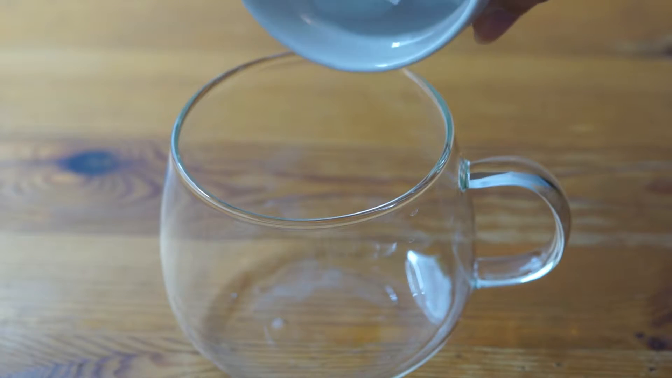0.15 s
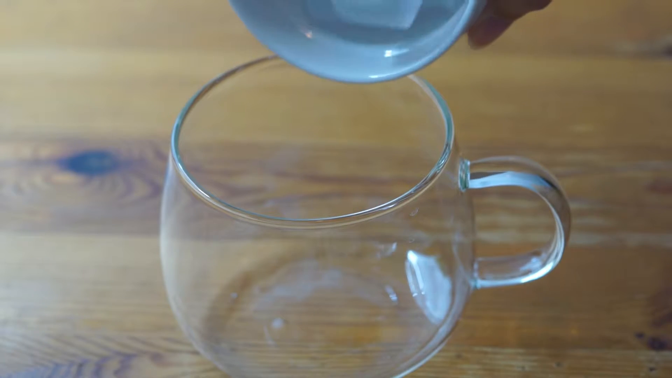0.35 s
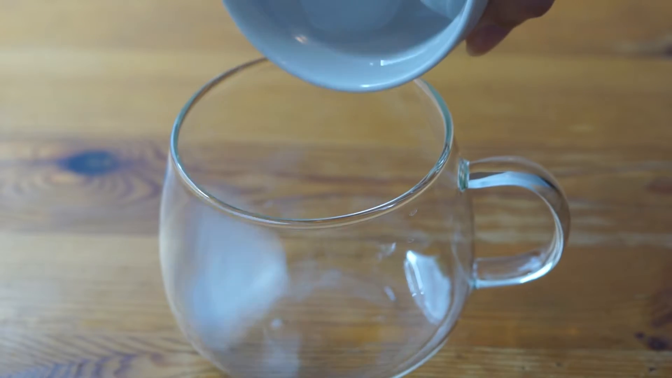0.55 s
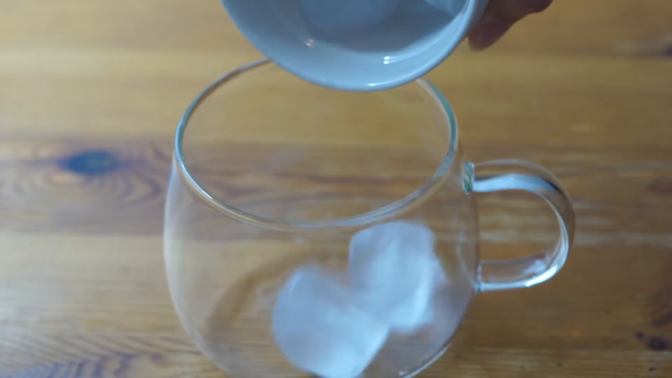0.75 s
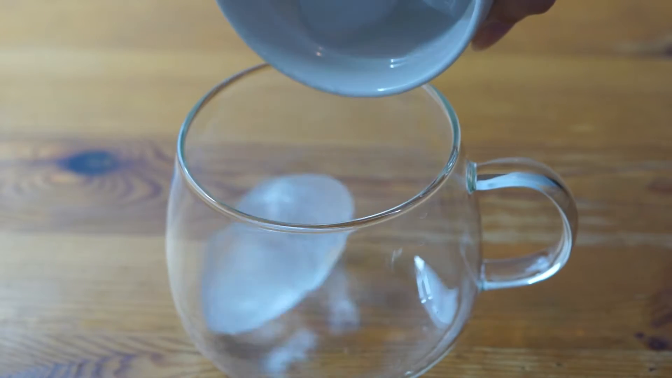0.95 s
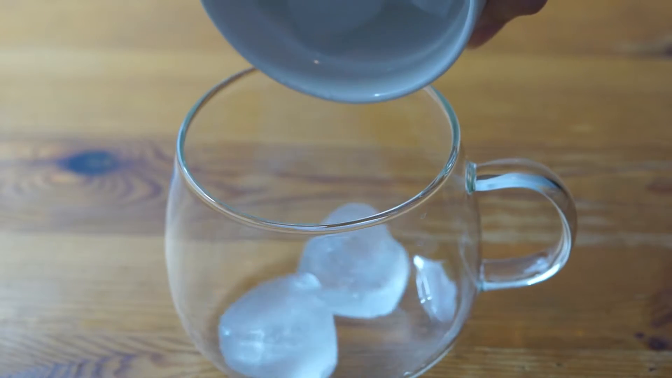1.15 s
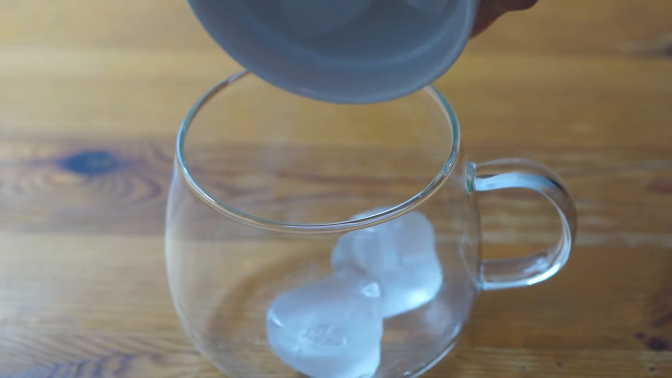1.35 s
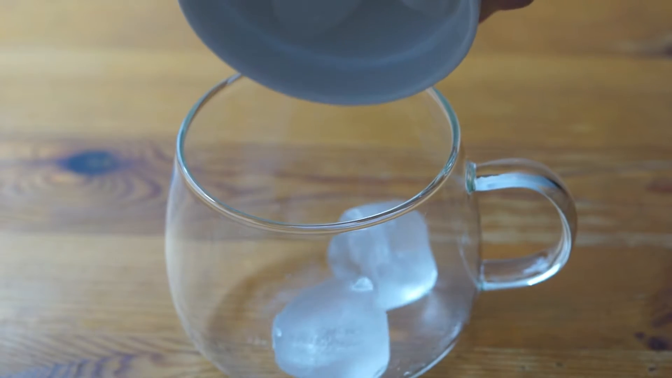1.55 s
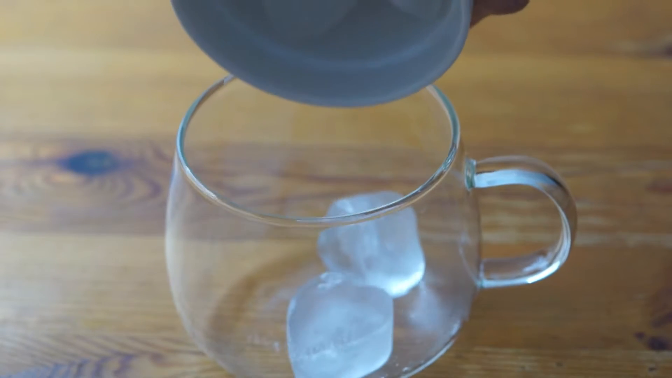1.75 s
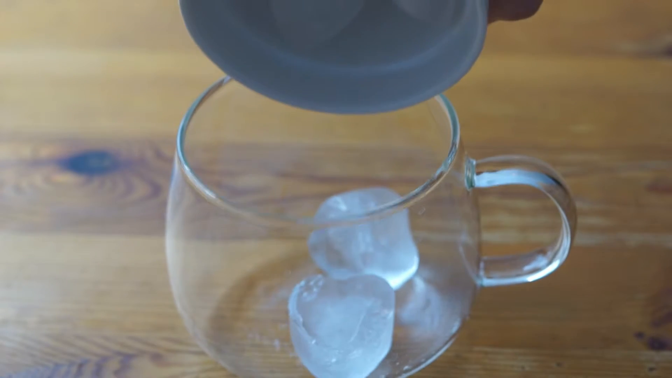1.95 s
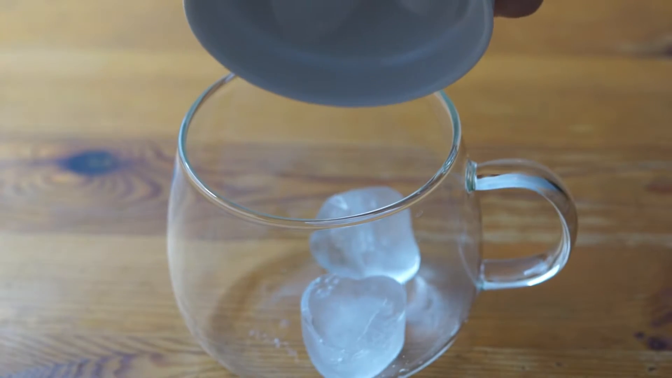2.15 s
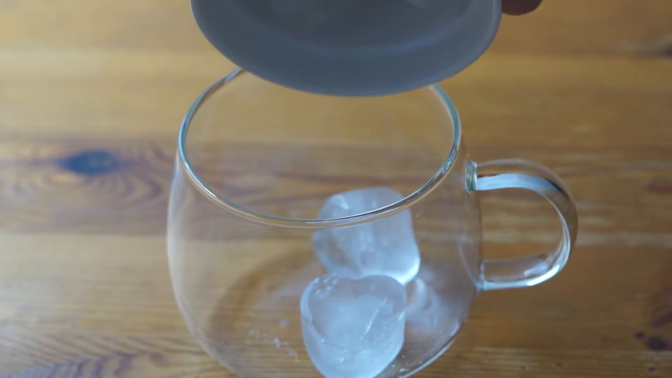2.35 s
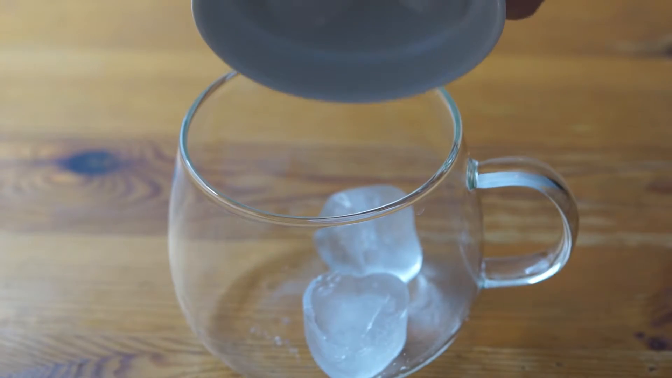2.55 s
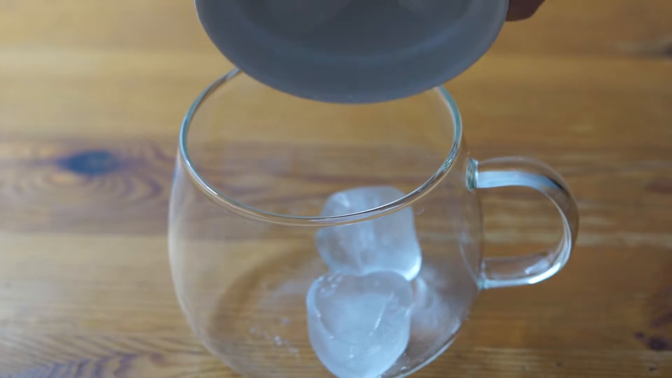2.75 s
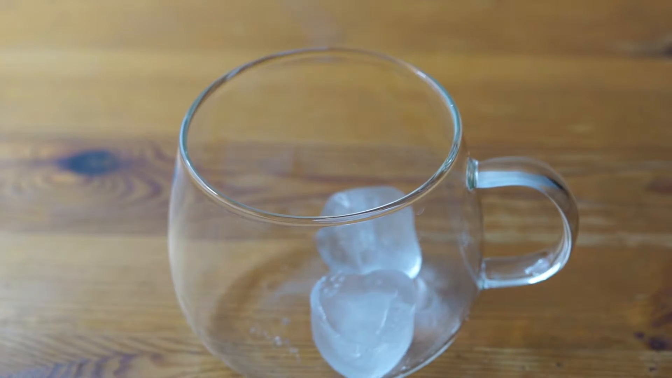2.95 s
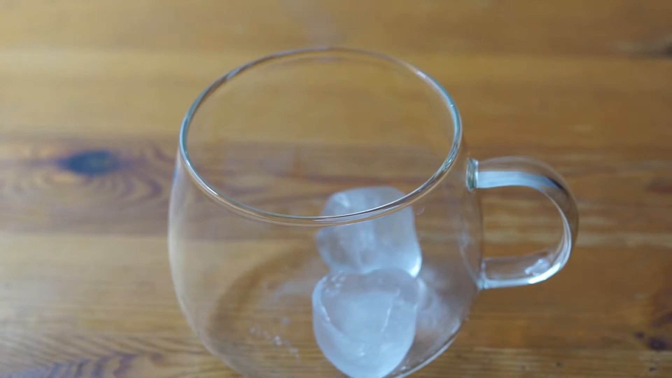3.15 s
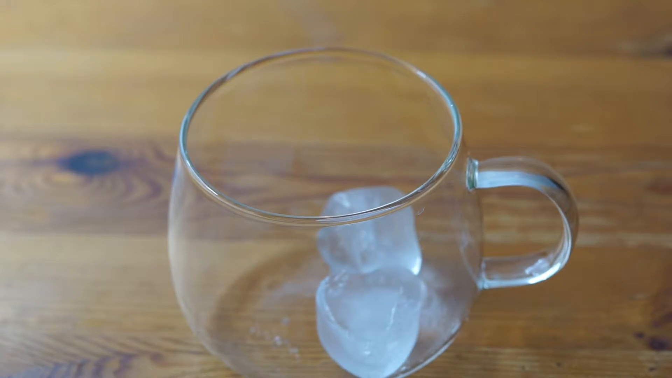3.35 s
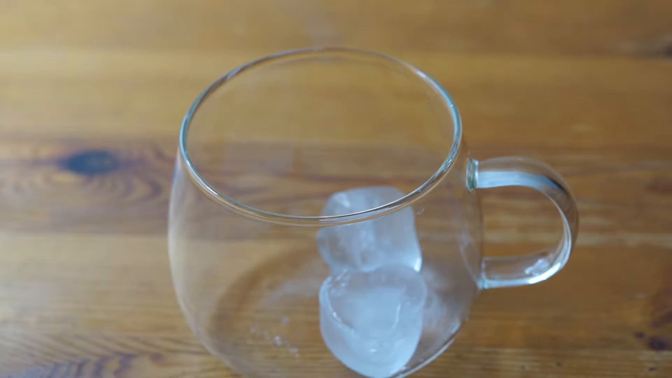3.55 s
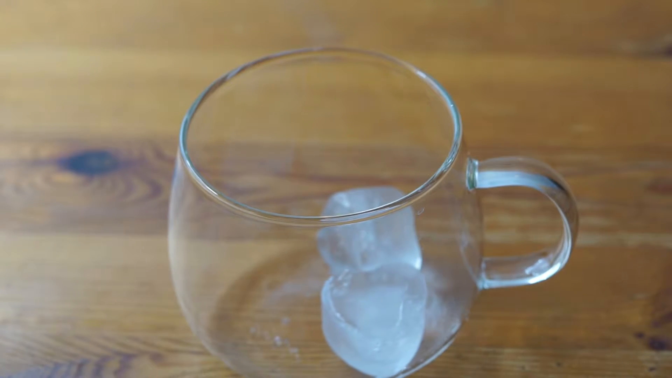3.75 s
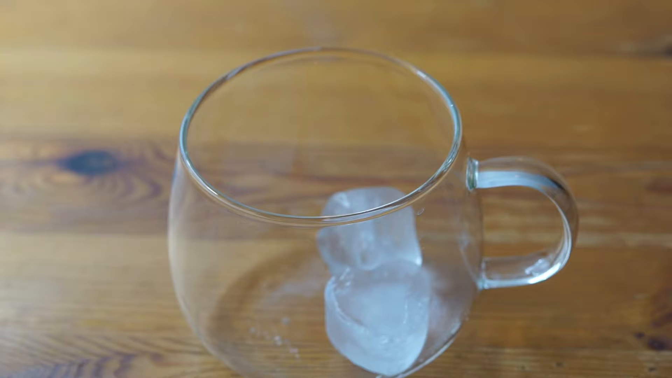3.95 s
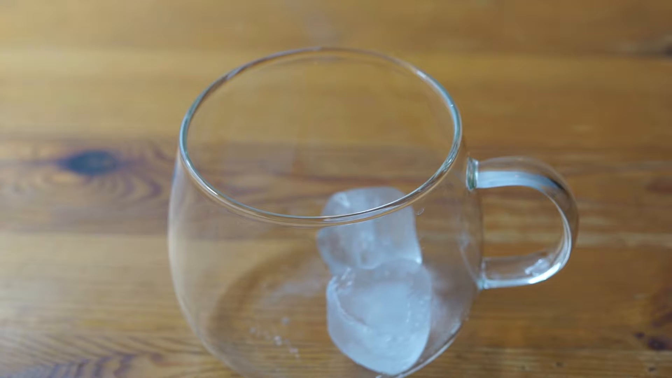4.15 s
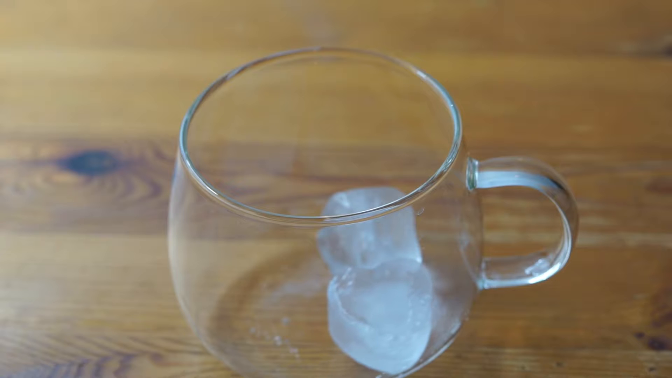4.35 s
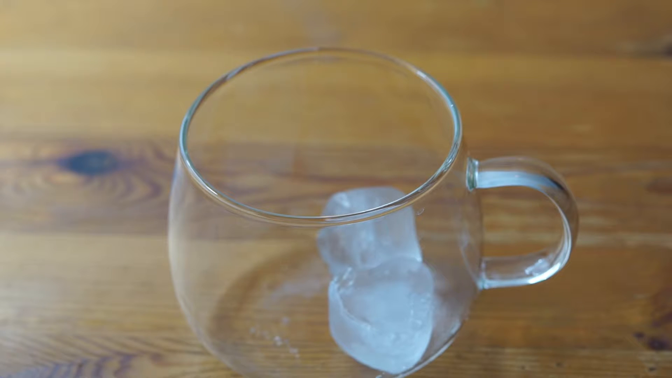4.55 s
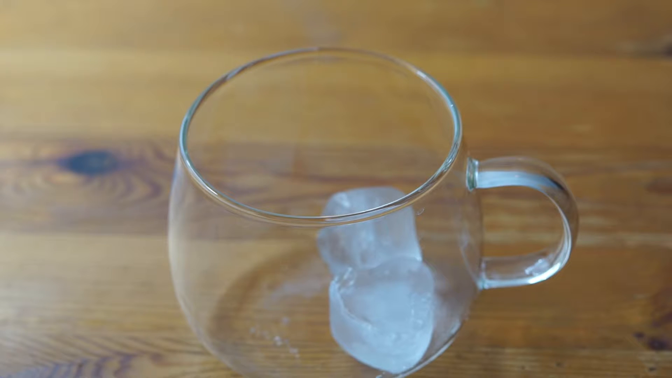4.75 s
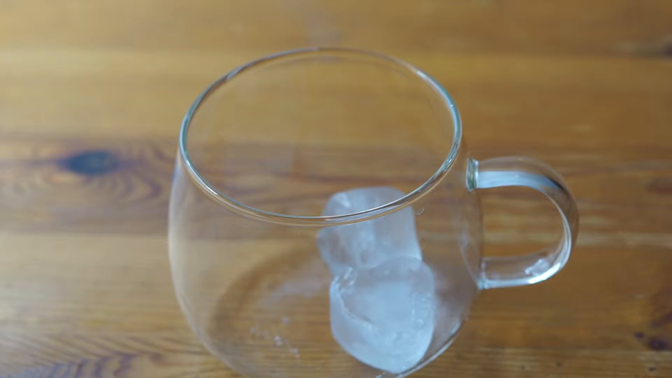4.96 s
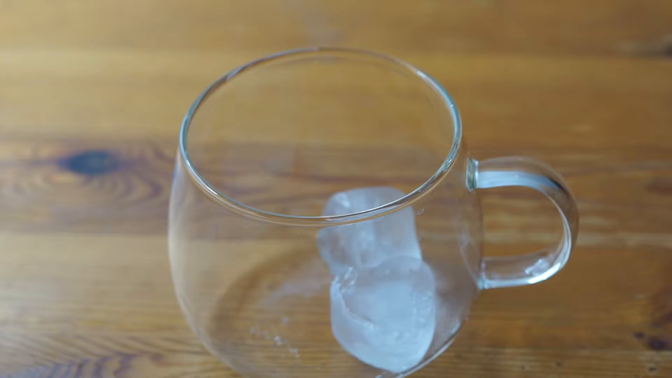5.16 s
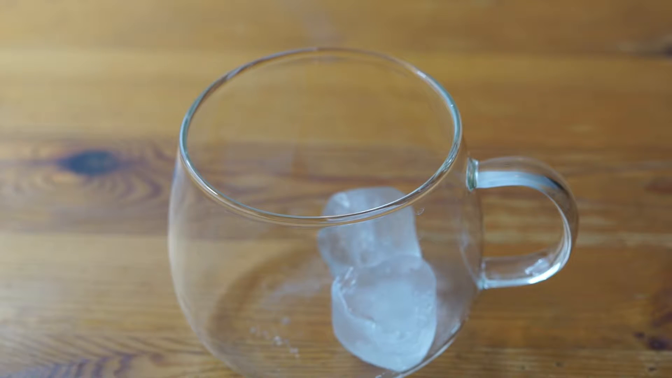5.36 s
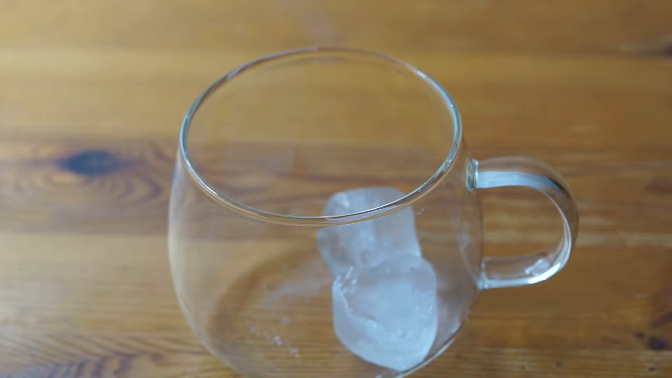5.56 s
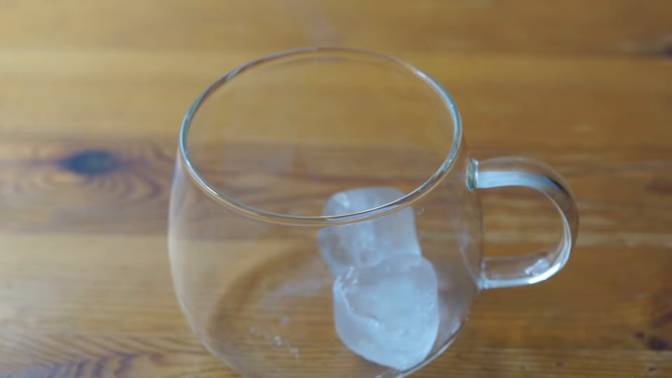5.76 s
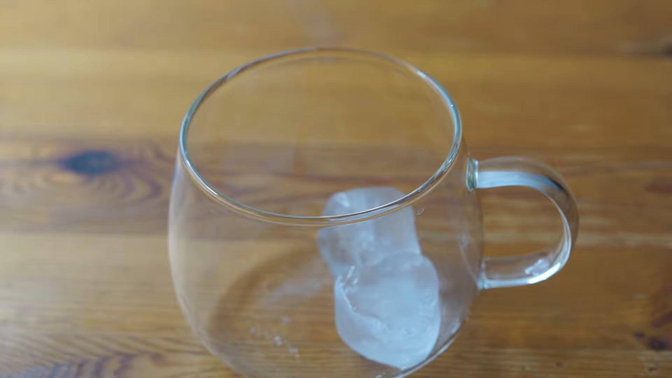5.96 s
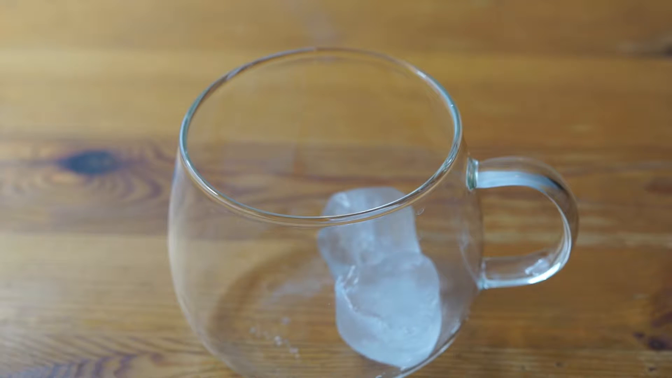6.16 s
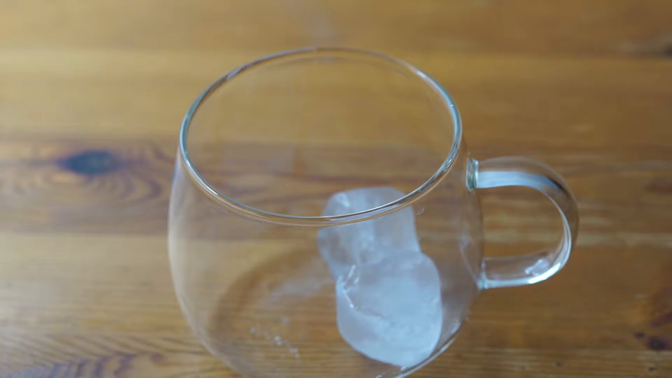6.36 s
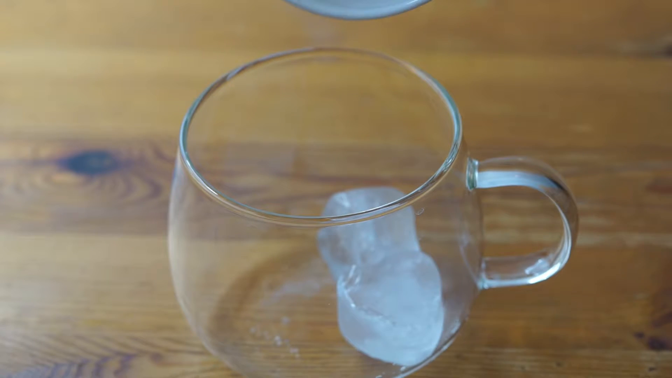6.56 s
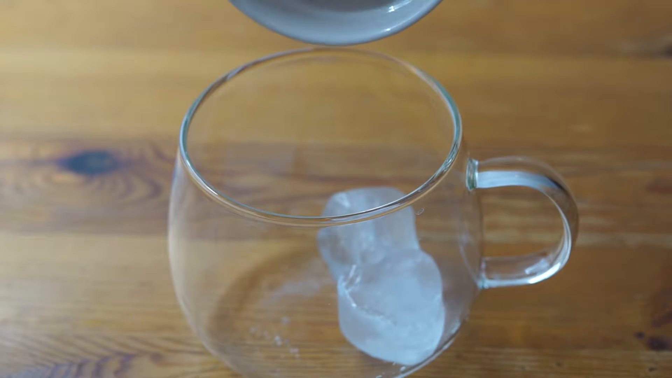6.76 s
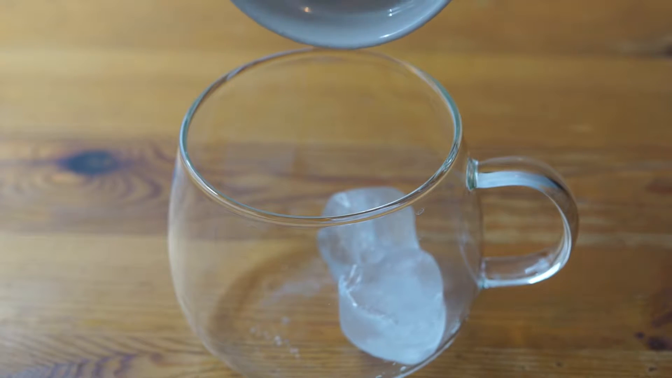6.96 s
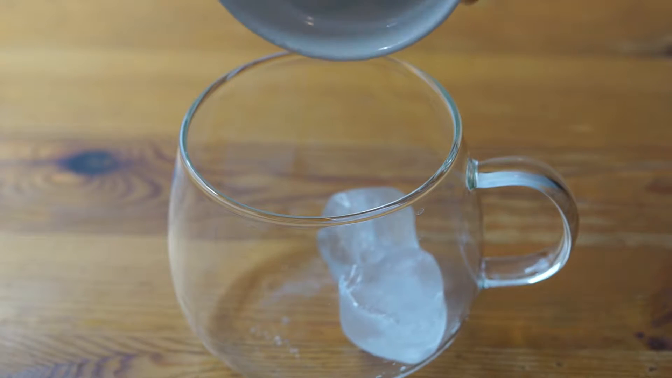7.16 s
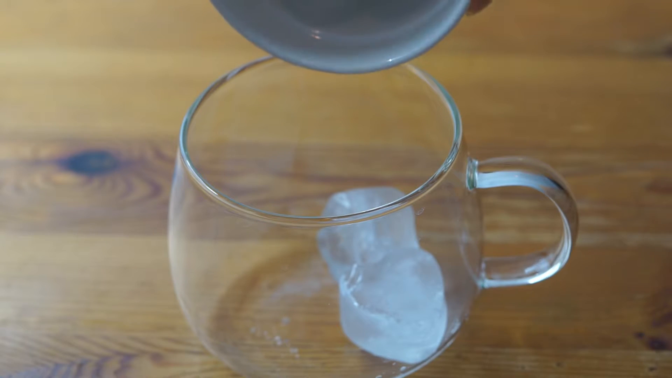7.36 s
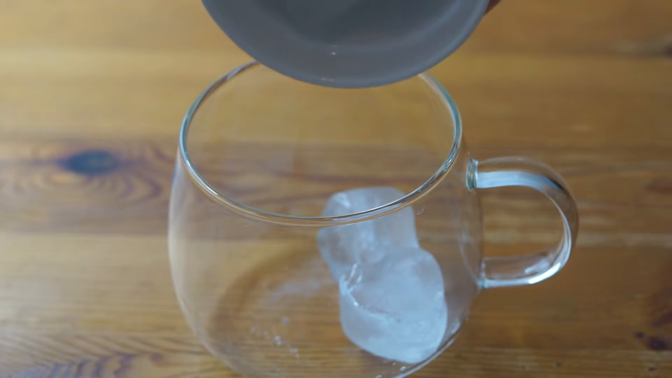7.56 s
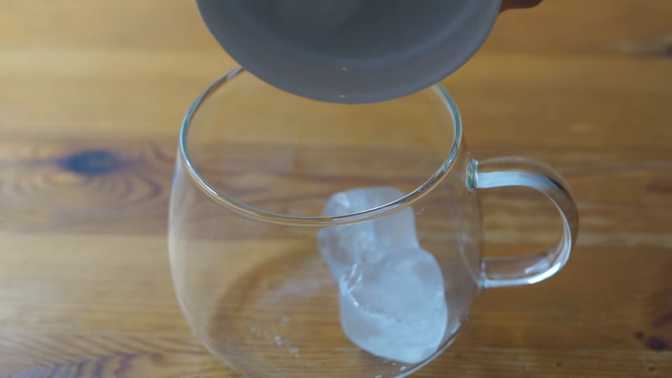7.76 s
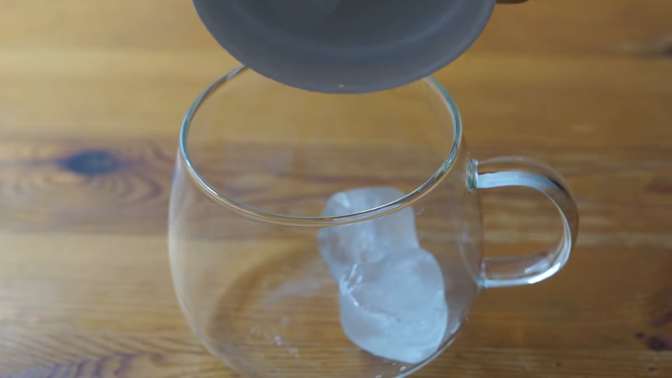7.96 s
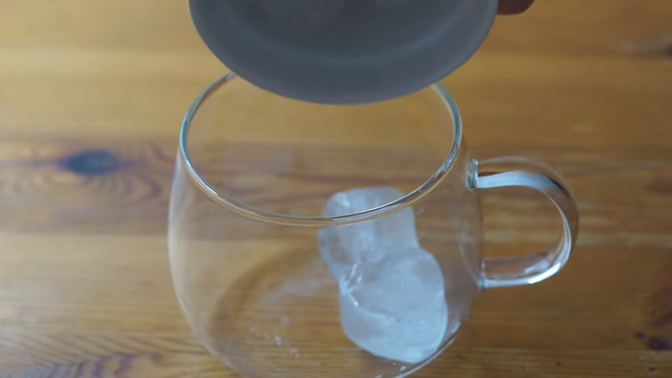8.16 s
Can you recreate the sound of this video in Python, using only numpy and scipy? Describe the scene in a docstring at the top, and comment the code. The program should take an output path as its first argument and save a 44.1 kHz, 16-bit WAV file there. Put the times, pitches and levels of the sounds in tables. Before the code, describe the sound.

At about 0.5 seconds, ice cubes tick against a china bowl as they slide out. They drop straight into a glass mug on a wooden table, making a close, bright burst of clinks with ringing glass and small hollow thuds. The cubes tumble until about 1.1 seconds, then skid and rattle to rest by 1.4. The bowl knocks on the rim, with distinct clinks around 1.8, 2.0 and 2.5 seconds and lighter taps between them.

From about 3.5 to 6.2 seconds, more cubes are gathered further away, slightly to the right, giving softer, dry clicks and clacks in irregular clusters. After that only the background remains until one light clink on the mug at about 8.1 seconds. A short kitchen reverberation follows each impact, and a very faint whine, hiss and low rumble lie underneath throughout.

```python
"""Ice cubes tumble round a glass mug on a wooden table, having slid out of a china bowl that then
knocks on the rim. Each impact is a brief burst of contact noise plus the damped normal modes of the
body struck. Further off, more cubes clack as they are gathered. A live kitchen reverberates after
every blow, over a faint whine, hiss and rumble."""
import sys
import numpy as np
from scipy import signal
from scipy.io import wavfile

SR = 44100
rng = np.random.default_rng(int(sys.argv[2]) if len(sys.argv) > 2 else 0)


def digitize_waveform(pressure):
    """Quantize a signal to 16-bit integers and store it at the path in sys.argv[1].

    Rows of a 2-D input are taken as channels; values are limited to [-1, 1].
    """
    field = np.atleast_2d(pressure).T
    bounded = np.clip(field, -1, 1)
    quanta = np.round(bounded * 32767).astype(np.int16)
    wavfile.write(sys.argv[1], SR, quanta)


N = 361619
TIME = np.arange(N) / SR


def from_db(db):
    """Decibels to amplitude ratio."""
    return 10 ** (np.asarray(db) / 20)


def rms_one(x):
    """Normalisation to unit power."""
    return x / np.sqrt(np.mean(x ** 2) + 1e-20)


def at_hz(points, hz):
    """Interpolation over log frequency."""
    frequencies, values = np.transpose(points)
    return np.interp(np.log(hz), np.log(frequencies), values)


def band(x, low_hz, high_hz, order=2):
    """Butterworth band-pass."""
    edges = [low_hz, min(high_hz, .45 * SR)]
    return signal.sosfilt(signal.butter(order, edges, "band", fs=SR, output="sos"), x)


def high_pass(x, hz):
    """Butterworth high-pass."""
    return signal.sosfilt(signal.butter(3, hz, "high", fs=SR, output="sos"), x)


def ring(clicks, hz, t60):
    """Damped oscillator: a unit impulse starts a decaying sine of height 1."""
    radius, angle = from_db(-60 / (t60 * SR)), 2 * np.pi * hz / SR
    return signal.lfilter([0, np.sin(angle)], [1, -2 * radius * np.cos(angle), radius ** 2], clicks + 1e-18)


def train(times, db):
    """Impulse excitation: one click of random sign per blow."""
    clicks = np.zeros(N)
    clicks[np.round(times * SR).astype(int)] = from_db(db) * rng.choice([-1, 1], len(times))
    return clicks


def struck(times, db, modes, share, spread_db=0.0):
    """Modal superposition: the strike point varies each mode by spread_db; resting ice shortens T60."""
    out, t = np.zeros(N + SR), np.arange(SR * 2 // 5) / SR
    hz, mode_db, t60 = np.transpose(modes)[:, :, None]
    scatter_db = rng.normal(0, spread_db, (len(times), len(modes), 1))
    waves = np.sin(2 * np.pi * hz * t)
    for k, start in enumerate(np.round(times * SR).astype(int)):
        decay_db = -60 * t / (t60 * share[k])
        partials = from_db(db[k] + mode_db + scatter_db[k] + decay_db) * waves
        out[start:start + len(t)] += partials.sum(axis=0)
    return out[:N]


def crack(clicks, low_hz, high_hz, t60):
    """Brittle contact: each impulse releases exponentially decaying noise."""
    envelope = signal.lfilter([1], [1, -from_db(-60 / (t60 * SR))], np.abs(clicks) + 1e-18)
    return band(envelope * rng.choice([-1, 1], N), low_hz, high_hz)


# Left-right likeness of the room's sound: (frequency [Hz], coherence [ratio])
COHERENCE = [(100, 1), (500, 0.93), (1000, 0.44), (2000, 0.6), (4000, 0.05), (16000, .0)]


def diffuse_noise(length, gain_at, first_hz=25, count=19):
    """Diffuse field: half-octave noise bands, less coherent between the ears towards the treble."""
    edges = first_hz * 2 ** (np.arange(count + 1) / 2)
    out, white = 0, rng.standard_normal((2, 2, length))
    for k, (low, high) in enumerate(zip(edges, edges[1:])):
        mid, side = band(white[k % 2], low, high)
        hz = np.sqrt(low * high)
        alike = at_hz(COHERENCE, hz)
        out += gain_at(hz) * (np.sqrt(1 + alike) * mid + np.sqrt(1 - alike) * side * [[1], [-1]])
    return out


# Whine lines and broad humps: (frequency [Hz], bandwidth [Hz], relative level [dB])
WHINE_LINES = [(245, 3.3, -72), (342, 16, -66), (1697, 4.3, -63.5), (1940, 8, -69), (2243, 26, -59.5),
               (2870, 18, -79.5), (2880, 84, -58.5), (3380, 48, -58), (3950, 20, -58), (4020, 200, -66.5),
               (5100, 45, -64), (5260, 10, -73), (7280, 19, -59), (8080, 6.7, -69.5), (9000, 45, -66),
               (10270, 170, -69), (11250, 910, -67.5), (13440, 500, -95), (15300, 600, -71.5)]


def whine():
    """Noise-driven resonances, with a steady tone inside each sharp, high line."""
    out, white = 0, rng.standard_normal((2, N))
    for hz, width_hz, db in WHINE_LINES:
        line = rms_one(band(white, hz - width_hz / 2, hz + width_hz / 2, order=1))
        if hz > 1000 and width_hz < 45:
            line += from_db(4) * np.sin(2 * np.pi * (hz * TIME + rng.random((2, 1))))
        out += from_db(db) * rms_one(line)
    return rms_one(out)


# Noise spectra: (frequency [Hz], relative spectral density [dB])
HISS_SPECTRUM = [(240, -42), (400, -4.5), (1820, -7), (2220, -13), (2590, -2.5), (2880, -15.5), (5190, -13),
                 (6540, -20), (7060, -29.5), (7870, -13.5), (16000, -12.5)]
RUMBLE_SPECTRUM = [(15, -30), (25, -15), (59, -10.5), (86, -36.5), (112, -5), (204, -3), (343, 0.5),
                   (600, -39.5), (780, -37.5), (1320, -120)]
# The noise sinks after the tumble and creeps back: (time [s], hiss and whine gain [dB], rumble [dB])
NOISE_LEVELS = [(0, -51, -60.5), (.6, -51.5, -59.5), (1.6, -67, -75.5), (2.5, -62, -69.5),
                (3.3, -61.5, -79.5), (4.1, -54.5, -72), (5.3, -55.5, -72.5), (6.3, -49, -62),
                (8.2, -50, -65)]
# Pulsation like a slow motor's: (harmonic [number], modulation depth [ratio])
THROB_HARMONICS = [(1, 0.13), (2, 0.076), (3, 0.16)]


def background(throb_hz=15, throb_peak_s=6.992):
    """Amplitude modulation: hiss and whine throb together above a rumble."""
    times, *levels = np.transpose(NOISE_LEVELS)
    hiss_db, rumble_db = [np.interp(TIME, times, db) for db in levels]
    hiss = diffuse_noise(N, lambda hz: from_db(at_hz(HISS_SPECTRUM, hz)), first_hz=213, count=13)
    rumble = diffuse_noise(N, lambda hz: from_db(at_hz(RUMBLE_SPECTRUM, hz)), count=11)
    swell = from_db(-64.5) * np.exp(-((TIME - 3.4) / .04) ** 2)
    phase = 2 * np.pi * throb_hz * (TIME - throb_peak_s)
    throb = 1 + sum(depth * np.cos(k * phase) for k, depth in THROB_HARMONICS)
    drone = from_db(-1.5) * rms_one(hiss) + from_db(2) * whine()
    return from_db(hiss_db) * throb * drone + (from_db(rumble_db) + swell) * rms_one(rumble)


# Ice on china, levels relative within a column:
# (time [s], crack [dB], snap [dB], low ring [dB], high ring [dB], share of free T60 [ratio])
BOWL_BLOWS = [(0.4581, -22.5, -20.5, -26.5, -61, 0.52), (0.4803, -16.5, -25, -14.5, -38.5, 0.91),
              (0.5205, -19.5, -40.5, -37.5, -13.5, 0.53)]
# Normal modes of the bowl: (frequency [Hz], relative level [dB], free T60 [s])
BOWL_MODES = [(2325, -1.5, 0.19), (2285, -10.5, 0.14), (2872, -7, 0.082), (5900, 4, 0.058),
              (5740, -5, 0.17), (10150, -8.5, 0.071)]


def bowl():
    """Impact excitation: sliding cubes knock the china into free vibration."""
    times, crack_db, snap_db, low_db, high_db, share = np.transpose(BOWL_BLOWS)
    contact = crack(train(times, crack_db + 5.5), 1700, 5400, t60=0.02)
    contact += crack(train(times, snap_db + 3), 6900, 17000, t60=0.0055)
    rings = struck(times, low_db - 0.5, BOWL_MODES[:3], share)
    rings += struck(times, high_db - 0.5, BOWL_MODES[3:], share)
    return contact, rings


# Blows on the mug, levels relative within a column: (time [s], crack [dB], snap [dB], thud [dB],
# knock [dB], hum [dB], belly ring [dB], rim ring [dB], share of free T60 [ratio])
MUG_BLOWS = [(0.5617, -6, -41.5, -24.5, -1, -35, -22, -56, 0.46),
             (0.6184, -5.5, -35.5, -42.5, -14.5, -21, -15, -31, 0.51),
             (0.6442, -26, -19, -21, 5, -21, -34, -43, 0.7),
             (0.679, -1, -23.5, -21, -0.5, -22, -31, -42, 0.91),
             (0.7121, -3.5, -18, -35, -28, -19.5, -26, -43, 0.5),
             (0.7446, -17, -24, -33, -10, -21.5, -15.5, -43, 0.68),
             (0.7703, -13, -29.5, -27, -16, -22, -20.5, -39, 0.68),
             (0.7907, -15.5, -12.5, -34, -22.5, -19, -27, -53.5, 0.37),
             (0.8189, -0.5, -28, -33, -4.5, -23, -27.5, -28, 0.53),
             (0.8401, -9, -21.5, -21, -28, -19.5, -28, -23, 0.31),
             (0.8675, -1.5, -33, -44.5, -9.5, -17.5, -24.5, -45.5, 1),
             (0.9185, -26, -27.5, -26, -6.5, -14.5, -22, -40, 1),
             (1.0219, -9, -26.5, -27, -13, -16.5, -26.5, -53, 0.33),
             (1.0606, -28, -31.5, -23.5, -3.5, -20.5, -24, -32, 0.22),
             (1.0858, -3.5, -27.5, -27, -11, -32, -39, -35, 0.58),
             (1.1989, -34, -50.5, -30, -10, -49.5, -26.5, -64, .5),
             (1.2812, -49, -55.5, -44, -14, -43, -30, -70, 0.26),
             (1.3184, -24, -39.5, -38, -16.5, -44.5, -50, -56, 0.34),
             (1.668, -46, -65.5, -41.5, -27, -59.5, -37, -63, 1.0),
             (1.7865, -50, -72.5, -18.5, -5, -45, -53, -66, 0.3),
             (1.8165, -14.5, -57.5, -21.5, -4, -41.5, -21, -30.5, 0.28),
             (1.8797, -46, -64.5, -30, -42, -47, -42, -77, .5),
             (2.0298, -10, -44.5, -18.5, -1, -65.5, -22.5, -26, 0.24),
             (2.093, -54, -58.5, -15, 0.5, -40, -51, -65, 0.32),
             (2.1602, -45, -68, -40, -35, -45.5, -68, -79, 1),
             (2.3453, -18, -61, -33.5, -19, -67.5, -47, -45, 0.49),
             (2.5478, -4, -26.5, -19.5, -7, -32.5, -57, -22.5, 0.87),
             (8.1314, -34, -57, -69, -29, -53, -53, -70, 0.55)]
# Modes of the air in the mug and the table under it: (frequency [Hz], relative level [dB], free T60 [s])
THUD_MODES = [(260, 3.5, 0.14), (356.8, 7, 0.14), (378.5, 1, 0.079), (464, -0.5, 0.12), (559, -6, 0.24),
              (668, 1, 0.016), (1127, -3.5, 0.055), (1566, -27, 0.073)]
# Ringing modes of the glass mug and of the china bowl knocking its rim, in groups excited together:
# (frequency [Hz], relative level [dB], free T60 [s])
CLINK_GROUPS = [
    [(2369.5, 1.5, 0.21)],
    [(3166, 1, 0.13), (3157, 1, 0.51)],
    [(3333, 2, 0.091), (3450, 3.5, 0.026), (3470, -7.5, 0.073)],
    [(4032, 6, 0.29)],
    [(4760, -2, 0.39), (6440, -35, 0.13), (13300, -9, .15)],
    [(5000, -3, 0.21), (5000, -2, 0.23), (12200, -17, 0.22)],
    [(2298, 3, 0.35), (6894, 3, 0.3), (10620, -4, 0.13)],
]


def mug():
    """Impact excitation: each blow drives the clinking modes, the air cavity and the table."""
    times, crack_db, snap_db, thud_db, knock_db, _, belly_db, rim_db, share = np.transpose(MUG_BLOWS)
    contact = crack(train(times, crack_db - 1), 1400, 5050, t60=0.019)
    contact += crack(train(times, snap_db + 18), 7500, 16060, t60=0.0056)
    contact += crack(train(times, knock_db), 680, 1216, t60=0.027)
    rings = struck(times, thud_db - 4.5, THUD_MODES, np.full(len(times), .45), spread_db=4)
    hard_db = belly_db + crack_db / 2
    group_drives = [belly_db, rim_db, snap_db, (belly_db + snap_db) / 2 - 7.5,
                    hard_db, np.maximum(rim_db, hard_db - 0.5), rim_db - 5]
    for db, modes in zip(group_drives, CLINK_GROUPS):
        rings += struck(times, db - 0.5, modes, share, spread_db=5)
    return contact, rings


def mug_hum(hz=853, free_decay_db_per_s=65, rise_s=0.0027):
    """Free decay of the lowest wall mode, its amplitude set anew by every blow."""
    times, hum_db, share = np.transpose(MUG_BLOWS)[[0, 5, 8]]
    last = np.maximum(np.searchsorted(times, TIME) - 1, 0)
    decay_db = free_decay_db_per_s * (TIME - times[last]) / share[last]
    level = (TIME > times[0]) * from_db(hum_db[last] - decay_db)
    pole = np.exp(-1 / (rise_s * SR))
    envelope = signal.lfilter([1 - pole], [1, -pole], level)
    return np.sqrt(2) * envelope * np.sin(2 * np.pi * hz * TIME)


def skid(start_s=0.64, end_s=1.39, ticks_per_s=120, fade_db_per_s=33):
    """Poisson impacts: skidding cubes rattle and excite the clinking modes, heavily damped."""
    skidding = (TIME > start_s) & (TIME < end_s)
    scatter_db = 1.5 * np.minimum(rng.exponential(1, N), 4)
    sizes = from_db(-37 - fade_db_per_s * (TIME - start_s) + scatter_db)
    ticks = (rng.random(N) < ticks_per_s / SR) * skidding * sizes
    contact = crack(ticks * from_db(-4), 2500, 15000, t60=0.0015)
    rings = sum(ring(ticks * rng.standard_normal(N) * from_db(db - 5.5), hz, 0.17 * t60)
                for modes in CLINK_GROUPS for hz, db, t60 in modes)
    return contact, rings


# Ice on ice, levels relative within a column: (time [s], tick [dB], low mode [Hz], low mode [dB],
# main mode [Hz], main mode [dB], knock [dB], snap [dB])
ICE_CLACKS = [(3.5384, -12, 2870, -21, 3530, -34.5, -69, -21.5),
              (3.556, -25, 2450, -24, 5800, -26.5, -60, -26.5),
              (3.8041, -5.5, 2520, -34, 3760, -26.5, -23.5, -27.5),
              (4.191, -36, 2590, -38, 3800, -38.5, -56, -33.5),
              (4.2276, -22, 3220, -30, 3820, -21, -21, -23.5),
              (4.2448, -20, 2970, -47, 3770, -44, -22.5, -28),
              (4.283, -11, 2630, -24.5, 3620, -18.5, -47, -21.5),
              (4.3175, -4.5, 3080, -24.5, 3560, -34, -19.5, -15),
              (4.334, -19, 3070, -30, 3880, -22.5, -20, -20),
              (4.4303, -18, 2760, -30.5, 3800, -21.5, -32, -18.5),
              (4.487, -14, 2740, -35, 3700, -28, -27, -30.5),
              (4.7005, -30, 2370, -39, 3300, -49, -19.5, -39.5),
              (4.7266, -14.5, 2310, -28, 4270, -37, -34, -44),
              (4.7535, -5.5, 2880, -30.5, 3700, -23.5, -63, -53),
              (4.791, -15, 2670, -24.5, 4450, -30.5, -59, -46),
              (4.9122, -9, 2370, -45, 3870, -22.5, -49, -21.5),
              (4.9322, -10, 2840, -28.5, 4020, -20, -32, -19.5),
              (4.9682, -4, 2510, -21.5, 3940, -26, -19.5, -25.5),
              (4.9841, -19, 2400, -20.5, 4170, -38, -25, -33),
              (5.0849, -14, 2570, -29.5, 4340, -30, -21.5, -28),
              (5.1057, -4, 2360, -20, 3840, -24, -9.5, -26.5),
              (5.3141, -19, 3000, -25, 3620, -25, -33.5, -21.5),
              (5.3966, -13, 2900, -58, 3650, -18, -18.5, -19),
              (5.46, -7, 2560, -24, 3700, -21.5, -11, -25.5),
              (5.4843, -2.5, 2510, -18.5, 3430, -24, -13, -43),
              (5.5605, 0, 3040, -24, 3650, -22, -16, -26.5), (5.5896, -16, 2300, -26, 4050, -32, -28, -33),
              (5.6742, -34, 2300, -38, 3200, -59, -21, -40.5),
              (5.738, -16.5, 2590, -26, 3200, -32, -15.5, -38.5),
              (5.8272, -13, 3000, -26, 4040, -20.5, -28, -52),
              (5.8638, -18, 2280, -26, 4300, -32.5, -20, -32),
              (5.892, -11.5, 2830, -33.5, 3640, -35, -20, -42),
              (6.014, -40, 2890, -35, 3650, -34, -34, -60), (6.041, -18, 2640, -34, 3610, -36, -17.5, -48),
              (6.066, -16, 2200, -26, 3170, -35, -44, -35),
              (6.0941, -21, 2750, -16.5, 3690, -19.5, -42, -51),
              (6.1155, -21, 2850, -39, 3740, -46, -16, -32),
              (6.177, -4.5, 2280, -29.5, 3750, -29.5, -18, -27.5)]


def far_ice(top_hz=5395, ring_t60=0.021):
    """Mode splitting: uneven lumps collide with a dry tick and ring in short, rough clusters."""
    times, tick_db, low_hz, low_db, main_hz, main_db, knock_db, snap_db = np.transpose(ICE_CLACKS)
    mean_db = (low_db + main_db) / 2
    top_mode_hz = top_hz * (1 + 0.075 * rng.standard_normal(len(times)))
    ticks = band(train(times, tick_db + 11), 2800, 7300)
    ticks += from_db(-6.5) * np.roll(ticks, SR // 250)  # worktop reflection, 4 ms later
    knock = crack(train(times, knock_db + 14), 1130, 1840, t60=0.0044)
    knock += crack(train(times, knock_db - 6.5), 430, 1160, t60=0.012)
    body = crack(train(times, mean_db + 4.5), 3540, 6200, t60=0.028)  # crunch
    body += crack(train(times, snap_db + 16.5), 6140, 14500, t60=0.0024)
    t = np.arange(SR // 20) / SR
    split = 1 + 0.031 * np.array([[-1], [0], [1]]) * rng.uniform(0.14, 1.67, (len(times), 1, 1))
    for k, start in enumerate(np.round(times * SR).astype(int)):
        for hz, db in [(low_hz, low_db), (main_hz, main_db), (top_mode_hz, mean_db - 7.5)]:
            cluster = np.sin(2 * np.pi * hz[k] * split[k] * t).sum(axis=0)
            body[start:start + len(t)] += from_db(db[k] + 0.5 - 60 * t / ring_t60) * cluster
    return high_pass(ticks, 2250), high_pass(high_pass(body, 2530) + knock, 570)


# Reverberation time of the kitchen: (frequency [Hz], T60 [s])
KITCHEN_T60 = [(100, 0.22), (500, 0.34), (2000, 0.39), (5000, 0.37), (10000, 0.27), (16000, 0.21)]


def kitchen(x, gap_s, build_s):
    """Reverberation: dense reflections build up after a gap and decay band by band."""
    t = np.arange(SR) / SR
    tail = diffuse_noise(SR, lambda hz: from_db(-60 * t / at_hz(KITCHEN_T60, hz)))
    tail *= 1 - np.exp(-np.maximum(t - gap_s, 0) / build_s)
    return signal.fftconvolve(x[None], rms_one(tail) / np.sqrt(SR), axes=1)[:, :N]


def placed(x, left_db, lag_samples):
    """Level and time differences: direct sound reaches the left channel late."""
    return np.array([from_db(left_db) * np.roll(x, lag_samples), from_db(-left_db) * x])


def scene():
    """Superposition of direct, structure-borne and reverberant sound on the background."""
    noise = background()
    bowl_contact, bowl_rings = bowl()
    mug_contact, mug_rings = np.add(mug(), skid())
    jolt = from_db(-25) * band(mug_rings, 45, 120)  # the table passes each blow to the microphone
    contact = high_pass(bowl_contact + mug_contact, 300)
    rings = high_pass(bowl_rings + mug_rings, 400)
    ticks, clacks = far_ice()
    near = from_db(-7) * contact + from_db(-5.5) * rings + mug_hum()
    far = ticks + from_db(-4.5) * clacks
    direct = placed(near, left_db=.6, lag_samples=1) + placed(far, left_db=-2.6, lag_samples=2)
    room = kitchen(contact + rings, gap_s=0.00023, build_s=0.00093)
    room += from_db(2.5) * kitchen(clacks, gap_s=0.0025, build_s=0.0009)
    return direct + jolt + room + noise


# Notches of the microphone housing: (frequency [Hz], bandwidth [Hz], gain [dB])
HOUSING_DIPS = [(4160, 120, -7.5), (6860, 380, -7.5), (9550, 400, -3), (11460, 1000, -17),
                (14400, 400, -7.5)]


def record(dry, threshold_db=-19.5, squeeze=0.1, release_db_per_s=70, cutoff_hz=15750):
    """Filtering and compression: housing notches, a gentle quick-release limiter, a steep top cut."""
    for hz, width_hz, db in HOUSING_DIPS:
        resonance = signal.lfilter(*signal.iirpeak(hz, hz / width_hz, SR), dry)
        dry = dry - (1 - from_db(db)) * resonance
    power = signal.lfilter([.02], [1, -.98], np.mean(dry ** 2, axis=0))
    level_db = 10 * np.log10(power + 1e-12)
    release_db = release_db_per_s * TIME
    held_db = np.maximum.accumulate(level_db + release_db) - release_db
    limited = dry * from_db(-squeeze * np.maximum(held_db - threshold_db, 0))
    return signal.sosfilt(signal.ellip(12, .5, 60, cutoff_hz, fs=SR, output="sos"), limited)


dry = scene()
out = record(dry)
digitize_waveform(out)
```